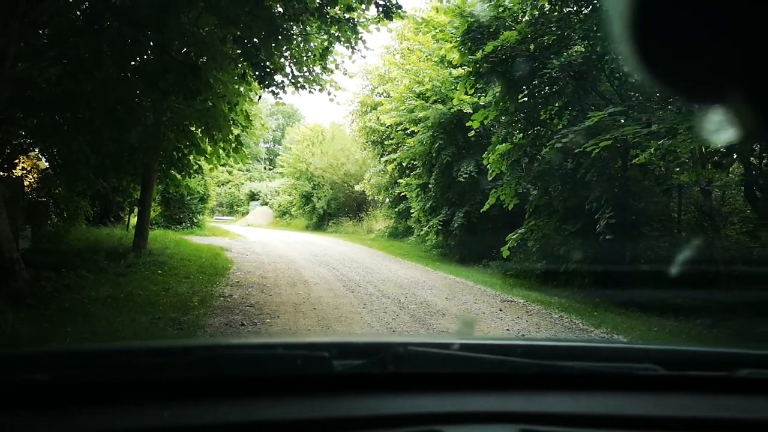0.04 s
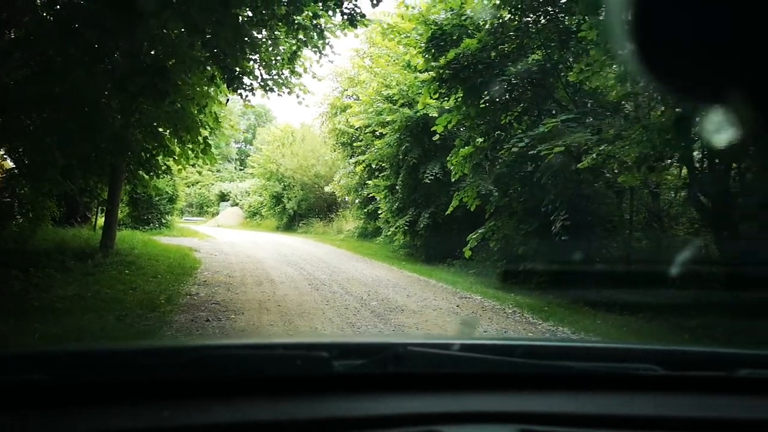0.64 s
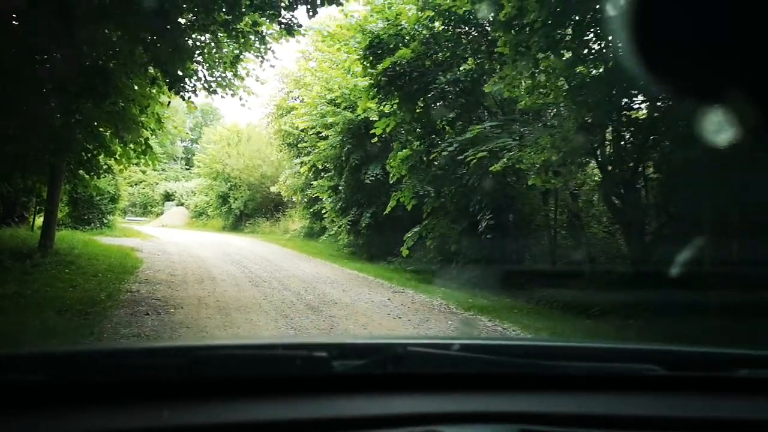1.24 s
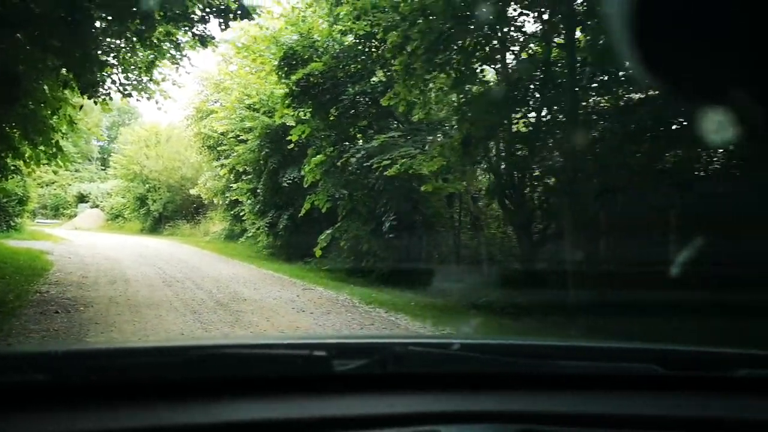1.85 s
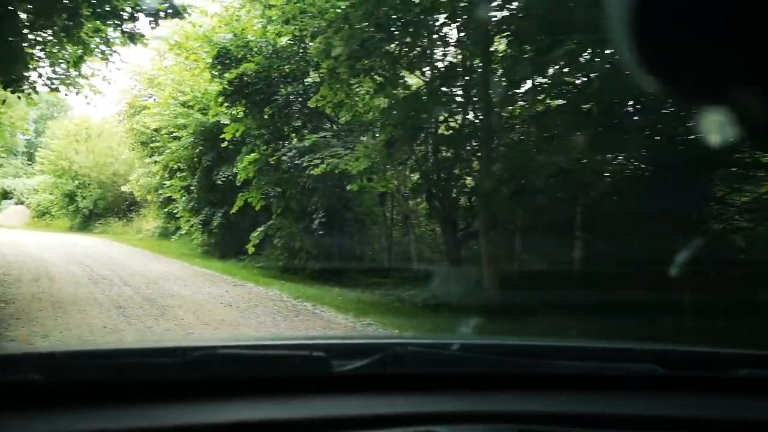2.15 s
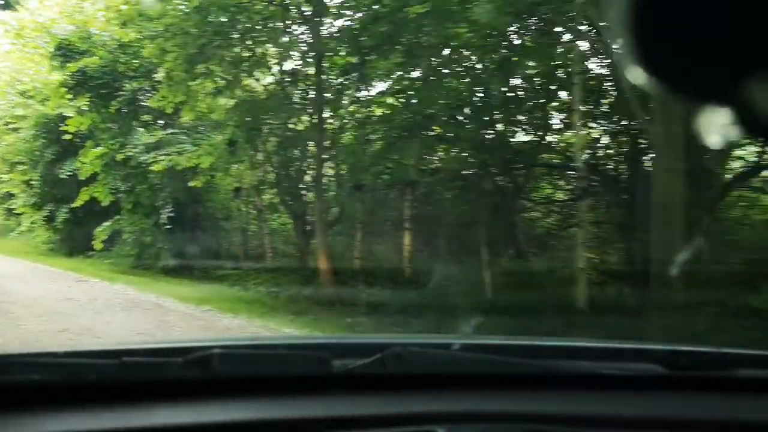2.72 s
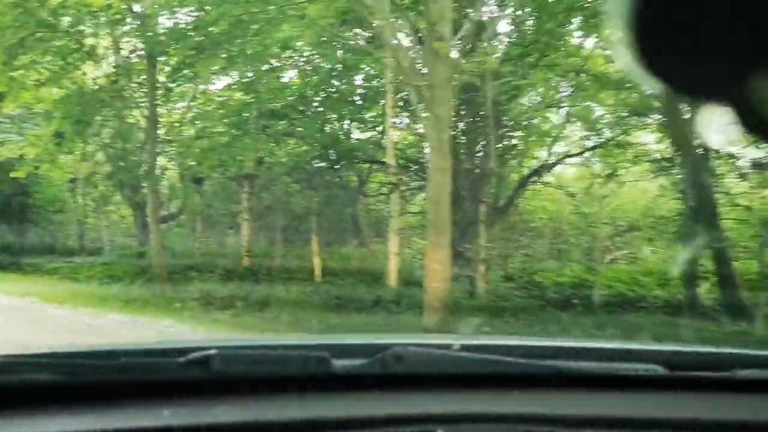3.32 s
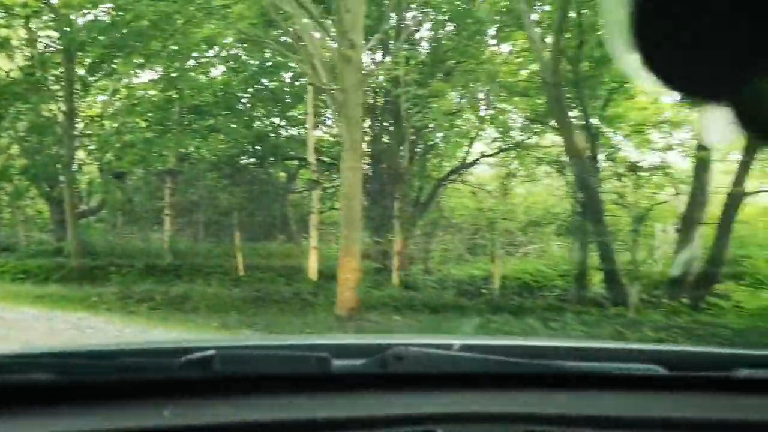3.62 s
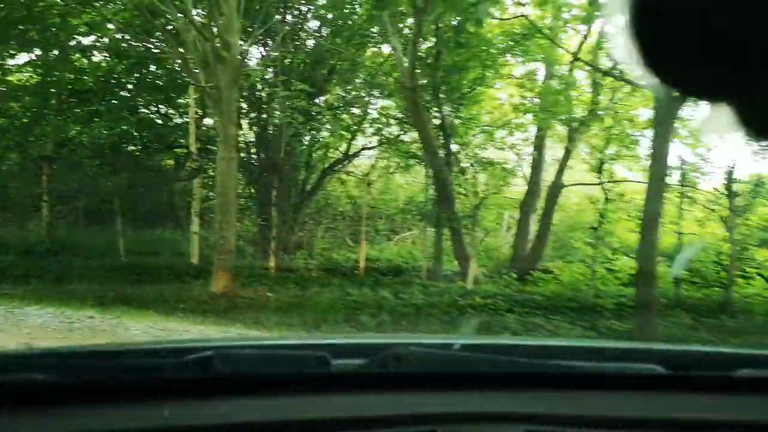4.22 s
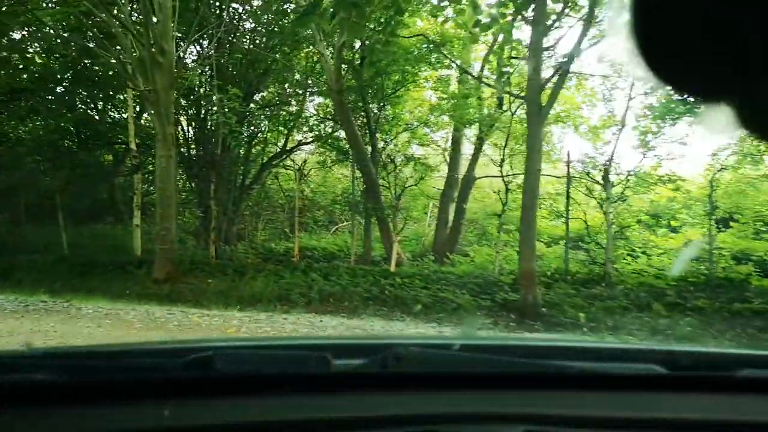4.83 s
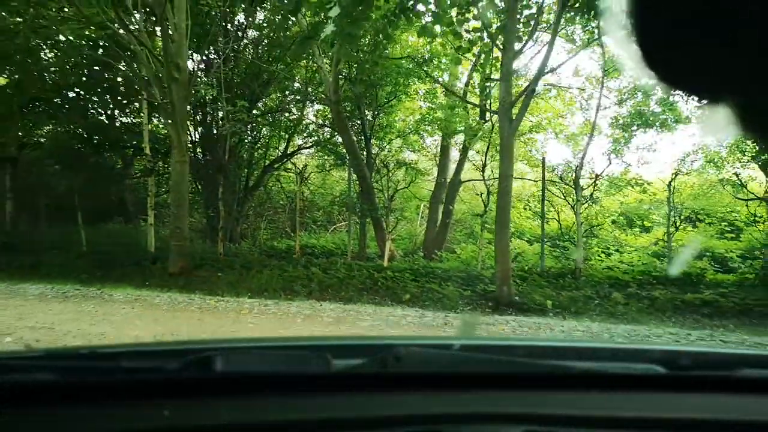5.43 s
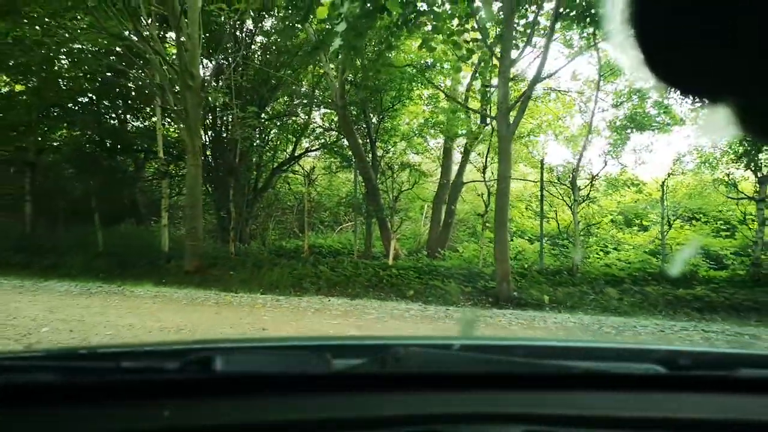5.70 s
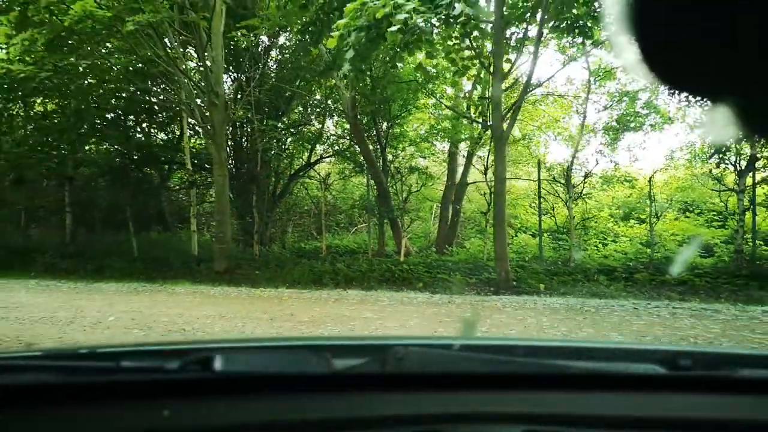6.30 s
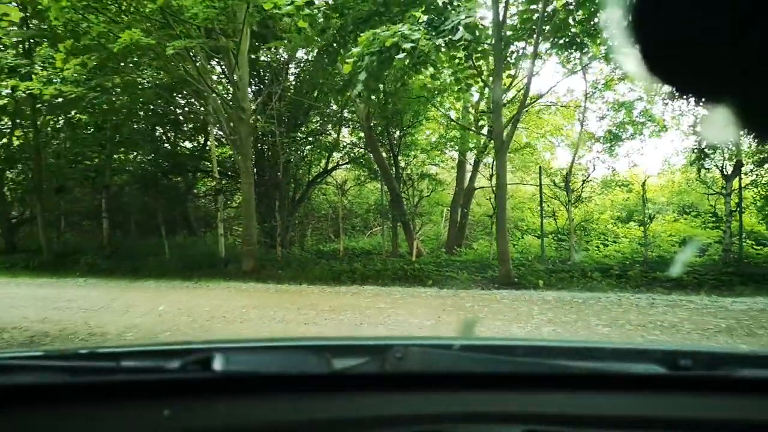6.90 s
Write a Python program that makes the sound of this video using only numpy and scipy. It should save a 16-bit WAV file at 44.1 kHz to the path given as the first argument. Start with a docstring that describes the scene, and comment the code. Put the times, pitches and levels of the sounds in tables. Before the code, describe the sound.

A low, steady rumble of engine and wheels fills the cabin of a slowly moving car, with the microphone behind the windscreen. A faint power steering whine fades early, and the panels drone over uneven ground. The engine booms louder around the middle and settles again. Much quieter, gravel crunches under the tyres, stones knock beneath the floor, the suspension gives dull thumps and the turning steering wheel rubs, clicks and creaks.

```python
"""Inside a car that creeps round a bend on a gravel track.
The engine booms when its firing matches the cabin's own note, and uneven ground makes the body rumble.
The tyres give a muffled crunch, stones knock under the floor and the suspension thumps.
The steering wheel hisses through the hands, and sticks and slips in creaks, scrapes and thin squeaks.
The power steering whines at first; gears, a belt, the tyre tread and air sound faintly behind it all."""
import sys
import numpy as np
from scipy import signal
from scipy.fft import rfft, irfft
from scipy.io import wavfile
from scipy.ndimage import uniform_filter1d

SR = 44100
rng = np.random.default_rng(int(sys.argv[2]) if len(sys.argv) > 2 else 0)


def wav_out(sig):
    """Save sig, one row per channel (or a flat mono array), as 16-bit PCM at SR to the path in sys.argv[1]."""
    wavfile.write(sys.argv[1], SR, np.round(np.clip(np.atleast_2d(sig).T, -1, 1) * 32767).astype(np.int16))


N = 315315
TIME = np.arange(N) / SR
EAR_DELAY_S = 0.0006  # a sound from the left reaches the right ear this much later


# how fast the crankshaft turns: (time [s], speed [turns/s])
ENGINE_SPEED = [(0, 26.6), (.5, 30.8), (.84, 31.3), (1.11, 27.4), (1.51, 25.2), (2.3, 27.3), (2.71, 31.4),
                (2.99, 32.8), (4.42, 32.3), (7.15, 30.9)]
# the engine rocking on its mounts: (time [s], level [dB])
ENGINE_SHAKE = [(0, -6), (.38, -11.5), (.5, -15.5), (.66, -9), (1.04, -23.5), (1.22, -7), (2.55, -13.5),
                (3.1, -10.5), (5.35, -10), (5.9, -14.5), (7.15, -14.5)]
# the throttle opening through the bend: (time [s], load [dB])
ENGINE_LOAD = [(0, -31), (.5, -21.5), (2.65, -26), (2.88, -10.5), (3.3, -11.5), (3.75, -14), (4.32, -12),
               (4.47, -20), (7.15, -20.5)]
def engine(cabin_hz=64.65, cabin_width_hz=7.5):
    """Four low tones at 1 to 4 times the turning speed; the second booms near the cabin's own note."""
    speed = curve(ENGINE_SPEED)
    angle = 2 * np.pi * (np.cumsum(speed) / SR - np.outer([EAR_DELAY_S, 0], speed))  # left side lags
    firing_hz = 2 * speed
    off_note_db = 10 * np.log10(1 + (2 * (firing_hz - cabin_hz) / cabin_width_hz) ** 2)
    boom_db = curve(ENGINE_LOAD) - off_note_db + 0.5 + 0.66 * drift(4.5)
    shake_db = curve(ENGINE_SHAKE) - 2.5 + 3 * drift(10)
    _, drone_db = ground()
    third_db = -35 + drone_db - drone_db.mean()
    fourth_db = -41 + 0.24 * (boom_db - boom_db.mean()) + 2 * drift(4)
    hum = sum(amp(db) * np.sin(k * angle + 2 * np.pi * rng.random())
              for k, db in enumerate([shake_db, boom_db, third_db, fourth_db], start=1))
    return hum * lean_left(-0.2)


# how uneven the track is: (time [s], rumble [dB], panel drone [dB])
ROUGHNESS = [(0, -45.5, -37.5), (.8, -42, -26.5), (2.3, -42, -22.5), (3.3, -45, -26.5), (4.25, -41.5, -27),
             (4.7, -44, -34.5), (6.3, -44.5, -33.5), (7.15, -42.5, -33)]
# humps in the track: (time [s], change in rumble [dB], change in panel drone [dB])
TRACK_HUMPS = [(.87, 3.5, 1.5), (1.3, 1.5, 6.5), (1.48, 7, -6.5), (1.81, 2.5, 11.5), (2.05, 2, -5),
               (2.38, 0, 5.5), (2.869, 5, 1.5), (5.27, 4.5, -0.5), (6.5, 5.5, -5.5)]
def ground(hump_s=0.076):
    """How hard the track shakes the car: rumble and drone levels in dB, shifted briefly by each hump."""
    humps = sum(np.outer(changes, np.exp(-((TIME - s) / hump_s) ** 2)) for s, *changes in TRACK_HUMPS)
    return np.array([curve(ROUGHNESS), curve(ROUGHNESS, column=2)]) + humps


# the deep note of the panels: (frequency [Hz], level [dB])
PANEL_SPECTRUM = [(30, -43), (55, -10.5), (78, 6.5), (92, -9), (110, -10), (132, -12), (160, -28),
                  (300, -80)]
# how alike left and right are for sound from the car's body: (frequency [Hz], likeness [-1 to 1])
BODY_LIKENESS = [(30, 1), (70, 0.97), (130, .9), (220, .92), (330, .66), (450, -0.23), (650, -0.49),
                 (2000, -0.33)]
def panels(gain_db=-4):
    """The body panels drone as the track shakes them."""
    _, drone_db = ground()
    return spread(noise(), PANEL_SPECTRUM, BODY_LIKENESS) * amp(drone_db + gain_db)


# the body swaying: (frequency [Hz], level [dB])
SWAY_SPECTRUM = [(5, -32.5), (13, 3.5), (20, -4), (32, -12.5), (45, -2.5), (60, -12), (80, -14),
                 (105, -24.5), (150, -39.5), (220, -87.5)]
# the wheels rumbling: (frequency [Hz], level [dB])
RUMBLE_SPECTRUM = [(60, -26), (128, 0.5), (160, -1.5), (200, -0.5), (250, -7.5), (300, -11.5), (370, -14),
                   (450, -24.5), (600, -30.5), (900, -46), (2000, -87.5)]
def road():
    """The body sways and rumbles as the wheels roll over uneven ground."""
    rough_db, _ = ground()
    sway = spread(noise(), SWAY_SPECTRUM, BODY_LIKENESS) * amp(-21 + 0.63 * (rough_db - rough_db.mean()))
    rumble = spread(noise(), RUMBLE_SPECTRUM, BODY_LIKENESS) * amp(rough_db - 1 + 1.56 * drift(7.3))
    return sway + rumble


# the crunch under the tyres: (time [s], level [dB])
CRUNCH_LEVEL = [(0, -64), (.4, -65.5), (.9, -62), (1.35, -63.5), (1.67, -57.5), (1.9, -61), (2.75, -60),
                (3.4, -64), (3.75, -64.5), (4.2, -60.5), (4.45, -67), (4.75, -60.5), (5.0, -69),
                (5.27, -61.5), (5.7, -63.5), (6.05, -60.5), (6.7, -61.5), (7.1, -56.5)]
# the crunch as it sounds indoors: (frequency [Hz], level [dB])
CRUNCH_SPECTRUM = [(250, -29), (520, -2.5), (660, -4.5), (750, -1.5), (830, -2), (950, -1.5), (1100, -5),
                   (1350, -7.5), (1640, -4), (1780, -1.5), (2000, -2), (2280, -4.5), (2500, -10),
                   (2850, -10), (3500, -18.5), (8000, -32.5), (16000, -65.5)]
# how alike left and right are for sound in the cabin air: (frequency [Hz], likeness [-1 to 1])
CABIN_LIKENESS = [(300, 0.035), (550, -0.041), (750, -0.64), (1000, -0.68), (1400, 0.046), (1800, 0.046),
                  (2400, -0.018), (4000, -0.1), (15000, 0.025)]
def gravel(gain_db=2):
    """Stones crackle finely under the tyres, muffled by doors and glass."""
    stones = grains(per_s=900, uneven_db=1.1, wash=0.94)
    stones = cabin_echoes(stones, echo_db=-5.5, decay_s=0.01, smooth_bins=9)
    crunch = spread(patchy(stones, depth_db=1.24), CRUNCH_SPECTRUM, CABIN_LIKENESS)
    return crunch * amp(curve(CRUNCH_LEVEL) + gain_db + drift(10)) * lean_left(0.6)


# stones hitting the floor: (time [s], level [dB], ringing pitch [Hz])
STONE_HITS = [(.852, -48, 1000), (.872, -46, 1300), (.889, -52, 900), (1.627, -48.5, 700),
              (1.648, -50, 1400), (1.666, -47, 1300), (2.164, -50.5, 1500), (3.973, -49.5, 750),
              (4.146, -50.5, 1000), (4.204, -49.5, 1200), (5.612, -45.5, 950), (5.627, -46, 1150),
              (5.675, -53, 1150), (5.725, -52.5, 950), (5.817, -42, 760), (5.977, -48, 1450),
              (6.257, -50, 950), (6.272, -51.5, 950), (6.837, -41.5, 850), (6.995, -52, 950),
              (7.017, -46.5, 750), (7.034, -47.5, 1050)]
# how the floor rings: (frequency [Hz], level [dB])
FLOOR_SPECTRUM = [(200, -5), (450, -13.5), (730, 1), (820, 1.5), (950, 2), (1100, -2.5), (1250, -9.5),
                  (1500, -9.5), (1800, -17.5), (3000, -25.5), (8000, -34), (16000, -62.5)]
def knocks(gain_db=2.5):
    """Stones squeezed out by the left tyres knock under the floor, each spot with its own note."""
    out = np.zeros((2, N))
    for s, db, hz in STONE_HITS:
        knock = blow(burst_s=0.0095, echo_s=0.028, echo_db=-10, rise_s=0.00019)
        add(out, s, amp(db + gain_db) * (knock + 0.86 * band(knock, hz, width_hz=260)))
    return ring(out, FLOOR_SPECTRUM) * lean_left(1.5)


# how the wheel arch rings: (frequency [Hz], level [dB])
ARCH_SPECTRUM = [(300, -33.5), (620, -11.5), (755, -4), (830, -7), (950, 3), (1050, -8), (1190, -10.5),
                 (1320, -16), (2200, -18), (6000, -61)]
def grinding(start_s=5.6, hardest_s=6.25, swell_s=0.71, trail_s=0.054):
    """Turned all the way, the left front tyre scrubs stones sideways; grit trails each knock."""
    stones = left_first(grains(per_s=200, uneven_db=0.5, wash=0.89)[0], EAR_DELAY_S)
    echoes = amp(-5) * noise()
    arch = unit(ring(stones + echoes, ARCH_SPECTRUM))
    scrub = amp(-55.5) * np.exp(-((TIME - hardest_s) / swell_s) ** 2)
    trails = sum(amp(db - 14) * (TIME > s) * np.exp(-abs(TIME - s) / trail_s)
                 for s, db, _ in STONE_HITS if s > start_s)
    return arch * np.hypot(scrub, trails) * amp(2 * drift(25)) * (TIME > start_s)


# jolts of the suspension: (time [s], level [dB])
JOLTS = [(2.997, -54), (3.617, -48), (3.972, -53), (5.126, -62), (5.388, -51.5), (6.471, -43.5),
         (6.837, -53.5)]
# the dull sound of a jolt: (frequency [Hz], level [dB])
JOLT_SPECTRUM = [(100, -0.5), (300, 0), (480, 0), (650, -3.5), (900, -16), (1500, -22), (4000, -50)]
def thumps(gain_db=12):
    """The suspension thumps where a wheel drops into a hollow."""
    out = np.zeros((2, N))
    for s, db in JOLTS:
        add(out, s, amp(db + gain_db) * blow(burst_s=0.0099, echo_s=0.011, echo_db=-13, rise_s=0.00029))
    return ring(out, JOLT_SPECTRUM)


# the rubbing, louder when the steering wheel slides faster: (time [s], level [dB])
RUB_LEVEL = [(0, -53.5), (.21, -61), (1.05, -64), (1.4, -69.5), (2.1, -70), (2.58, -65), (3.0, -67.5),
             (4.95, -71), (5.12, -65.5), (5.33, -65), (5.5, -72.5), (5.9, -65), (6.17, -71), (6.8, -67.5),
             (7.05, -59.5)]
# the hiss of hands on the rim: (frequency [Hz], level [dB])
RUB_SPECTRUM = [(1500, -27), (2600, -3), (3700, -3), (5200, -4), (5800, -1.5), (6400, -6.5), (7200, -2),
                (7900, -2), (9200, -11), (10200, -24.5), (15500, -44.5)]
def rubbing(gain_db=2):
    """The steering wheel slides through the hands with a fine, gritty hiss."""
    slips = grains(per_s=700, uneven_db=1.2, wash=1.3)
    slips = cabin_echoes(slips, echo_db=-5, decay_s=0.02, smooth_bins=21)
    hiss = spread(patchy(slips, depth_db=1.3), RUB_SPECTRUM, CABIN_LIKENESS)
    return hiss * amp(curve(RUB_LEVEL) + gain_db + 0.6 * drift(40)) * lean_left(0.8)


# single slips of the steering wheel and trim: (time [s], level [dB], ringing pitch [Hz])
SLIPS = [(1.114, -50.5, 3100), (1.449, -49.5, 6540), (1.505, -57, 4700), (1.544, -49.5, 4750),
         (1.592, -45.5, 2500), (1.618, -47, 4400), (1.636, -47, 4600), (1.647, -45, 4600),
         (1.665, -44, 4400), (1.678, -42, 4920), (1.699, -44.5, 4400), (1.819, -54, 4860),
         (1.944, -49.5, 4500), (2.010, -49.5, 8300), (2.052, -54.5, 4800), (3.739, -54.5, 4199),
         (3.754, -54.5, 4200), (3.819, -51, 4030), (3.833, -51.5, 5500), (3.876, -51, 4800),
         (3.884, -50, 5300), (3.893, -49, 5000), (3.920, -43.5, 4300), (3.972, -51.5, 2203),
         (4.037, -56, 7305), (4.054, -48.5, 7600), (5.124, -46, 5000), (5.234, -48, 2948),
         (5.239, -49, 5000), (5.248, -50, 4997), (5.269, -49, 2700), (5.331, -45.5, 2700),
         (5.338, -53, 2700), (5.372, -47, 2760), (5.393, -50, 2800), (5.876, -53, 5993), (5.901, -52, 7700),
         (5.967, -53, 5500), (6.012, -53, 5500), (6.067, -56, 4760), (6.199, -48.5, 2960),
         (6.411, -45, 7000), (6.452, -49, 4700), (6.481, -44, 2600), (6.511, -43.5, 7900),
         (6.895, -41.5, 3000), (6.906, -46, 5200), (6.913, -44, 4000), (6.928, -46, 4500),
         (7.015, -50, 5000)]
# how the plastic rings: (frequency [Hz], level [dB])
PLASTIC_SPECTRUM = [(300, -22), (700, -5), (1500, -6), (2300, -1), (2800, -1), (3300, -4.5), (4200, -3.5),
                    (5600, -2.5), (6500, -7), (7900, -4.5), (9300, -12), (11000, -21), (16000, -41)]
def creaks(gain_db=-4):
    """Plastic sticks, then slips with a dry snap; a quick run of snaps makes a creak."""
    out = np.zeros((2, N))
    for s, db, hz in SLIPS:
        delay_s = EAR_DELAY_S * rng.random()
        snap = blow(burst_s=0.0013, echo_s=0.017, echo_db=-19, rise_s=0.0011, delay_s=delay_s)
        snap = snap + 1.6 * band(snap, hz, width_hz=850)
        attack = snap[:, :round(0.004 * SR)]  # the snap itself sets the level, not its echoes
        add(out, s, snap / attack.std() * amp(db + gain_db))
    return ring(out, PLASTIC_SPECTRUM) * lean_left(1.5)


# longer scrapes: (time [s], length [s], pitch [Hz], band width [Hz], level [dB])
TRIM_SCRAPES = [(.45, .014, 1890, 1500, -56), (1.696, 0.12, 5170, 2510, -62), (2.71, 0.057, 2040, 800, -60),
                (3.129, .084, 4000, 3030, -64), (3.47, .034, 1980, 500, -60.5),
                (3.597, .082, 4870, 715, -67), (3.828, 0.085, 4600, 1796, -61.5),
                (4.058, .1, 7710, 1210, -68.5), (5.214, .08, 2500, 1700, -58.5),
                (5.381, .13, 5100, 2600, -64), (5.367, 0.062, 2760, 280, -55.5),
                (5.868, .11, 7600, 1010, -61.5), (5.964, .2, 1990, 390, -59), (6.33, .11, 7760, 1000, -61),
                (6.892, .065, 3000, 3000, -53.5), (6.938, 0.12, 3450, 2000, -66)]
def scrapes():
    """Runs of tiny slips swell and fade, each ringing one note of the trim."""
    out = np.zeros((2, N))
    slips = grains(per_s=1400, uneven_db=2, wash=1)
    for s, length_s, hz, width_hz, db in TRIM_SCRAPES:
        run = slips[:, int(s * SR):][:, :int(length_s * SR)]
        run = band(band(run, hz, width_hz), hz, 2 * width_hz)
        fade = signal.windows.tukey(run.shape[1], 0.7)
        add(out, s, unit(run * fade) * amp(db))
    return out * lean_left(2.5)


# thin squeaks: (time [s], length [s], first pitch [Hz], last pitch [Hz], level [dB])
RIM_SQUEAKS = [(1.16, 0.21, 2260, 2170, -68), (1.39, .07, 2630, 2400, -62), (1.426, .085, 2390, 2290, -56),
               (1.463, 0.058, 2490, 2660, -61), (5.049, .25, 2018, 1940, -61), (5.42, .14, 2270, 2360, -64)]
def squeaks(gain_db=1):
    """Where its slips fall nearly into step, the steering wheel's rim sings a short, raspy glide."""
    out = np.zeros((2, N))
    stutter = 1 + 0.035 * drift(170)
    for s, length_s, start_hz, end_hz, db in RIM_SQUEAKS:
        progress = np.clip((TIME - s) / length_s, 0, 1)
        hz = (start_hz + (end_hz - start_hz) * progress) * stutter
        out += np.sin(np.pi * progress) * tone(hz, db + gain_db, wobble=0.006, flutter_db=1)
    rasp = unit(1 + 0.35 * drift(200))
    return out * rasp * lean_left(3)


def steering_whine(end_s=1.5, fade_s=0.17):
    """The power steering sings two tones, loudest while it strains, then sinks in pitch and fades."""
    hz = 959 + 61.9 * np.exp(-TIME / 0.17)
    strain_db = 12 * np.exp(-TIME / 0.085)
    lower = tone(hz, db=-62 - 8 * TIME + strain_db, wobble=0.006)
    upper = tone(hz * 1.095, db=-69, wobble=0.0048)
    return (lower + upper) * np.clip((end_s - TIME) / fade_s, 0, 1)


# the gearbox's note, which follows the car's speed: (time [s], pitch [Hz])
GEAR_PITCH = [(0, 295.8), (1.4, 274.3), (3.1, 319.6), (5.0, 258.3), (7.15, 245.8)]
def gearbox():
    """The turning gears hum, slowly getting quieter."""
    return tone(curve(GEAR_PITCH), db=-54 - 0.52 * TIME, wobble=0.025)


def belt():
    """A running belt whines faintly and dies away."""
    return tone(hz=610, db=-64.5 - 2.5 * TIME, wobble=0.025)


def tread(start_s=1.25, length_s=1.55, start_hz=305, rise_hz_per_s=122):
    """The tyre tread gives a rough, rising moan as the car picks up speed."""
    age = np.clip(TIME - start_s, 0, length_s)
    swell = np.sqrt(abs(np.sin(np.pi * age / length_s)))
    return swell * tone(start_hz + rise_hz_per_s * age, db=-60, wobble=0.054)


# air in the cabin: (frequency [Hz], level [dB])
AIR_SPECTRUM = [(300, -19), (530, -1.5), (760, -1), (950, -1.5), (1150, -8), (1500, -12.5), (3000, -30)]
def cabin_air(level_db=-65):
    """A faint, steady rush of air."""
    return spread(noise(), AIR_SPECTRUM, CABIN_LIKENESS) * amp(level_db)


def amp(db):
    """Turns decibels into a gain."""
    return 10 ** (np.asarray(db) / 20)


def lean_left(db):
    """Gains that turn the left side up and the right side down by db."""
    return amp([[db], [-db]])


def unit(x):
    """Scales a signal to an average strength (rms) of 1."""
    return x / np.sqrt(np.mean(x ** 2) + 1e-20)


def noise(size=N):
    """White noise, different on each side."""
    return rng.standard_normal((2, size))


def curve(rows, column=1):
    """Joins a timed table's points with straight lines."""
    rows = np.array(rows)
    return np.interp(TIME, rows[:, 0], rows[:, column])


def look_up(rows, hz):
    """Reads a frequency table on a logarithmic scale."""
    row_hz, value = np.transpose(rows)
    return np.interp(np.log(hz + 1), np.log(row_hz + 1), value)


def add(mix, s, sound):
    """Lays a stereo sound into the mix at s seconds."""
    part = mix[:, max(round(s * SR), 0):][:, :sound.shape[1]]
    part += sound[:, :part.shape[1]]


def drift(hz):
    """A random wander of strength 1, up to about the given rate."""
    f = np.fft.rfftfreq(N, 1 / SR)
    return unit(irfft(rfft(rng.standard_normal(N)) * np.exp(-(f / hz) ** 2), N))


def spread(pair, spectrum, likeness):
    """Shapes two unrelated signals to a spectrum and blends them into left and right."""
    hz = np.fft.rfftfreq(N, 1 / SR)
    same = np.clip(look_up(likeness, hz), -1, 1)
    mid, side = rfft(pair) * amp(look_up(spectrum, hz)) * np.sqrt([1 + same, 1 - same])
    return unit(irfft(np.array([mid + side, mid - side]), N))


def ring(x, spectrum, size=4096):
    """Lets blows ring through a body with the given spectrum."""
    log_gain = np.log(amp(look_up(spectrum, abs(np.fft.fftfreq(size, 1 / SR)))))
    causal_gain = np.exp(np.conj(signal.hilbert(log_gain)))  # rings only after the blow
    response = np.fft.ifft(causal_gain).real[:size // 2]
    return signal.oaconvolve(x, response[None] / np.linalg.norm(response), axes=1)[:, :N]


def band(x, hz, width_hz):
    """Keeps the sound near one pitch."""
    return signal.lfilter(*signal.iirpeak(hz, hz / width_hz, fs=SR), x)


def left_first(x, delay_s):
    """Makes a stereo pair whose right side comes late."""
    t = TIME[:len(x)]
    return np.array([x, np.interp(t - delay_s, t, x, left=0)])


def blow(burst_s, echo_s, echo_db, rise_s, delay_s=EAR_DELAY_S, size=4000):
    """A short burst of noise from the left, followed by cabin echoes."""
    t = TIME[:size]
    burst = rng.standard_normal(size) * np.exp(-t / burst_s) * (1 - np.exp(-t / rise_s))
    echoes = amp(echo_db) * noise(size) * np.exp(-t / echo_s) * (1 - np.exp(-t / burst_s))
    return left_first(burst, delay_s) + echoes


def grains(per_s, uneven_db, wash):
    """Tiny impacts of uneven size over a wash of countless smaller ones."""
    sizes = amp(uneven_db * np.minimum(rng.exponential(1, N), 4))
    hits = rng.random(N) < per_s / SR
    return unit(sizes * hits * noise()) + wash * noise()


def tone(hz, db, wobble, flutter_db=3):
    """A note with unsteady pitch and level that reaches the left side first."""
    hz = hz * (1 + wobble * drift(30))
    turns = np.cumsum(hz) / SR - np.array([[0], [EAR_DELAY_S]]) * hz
    return unit(np.sin(2 * np.pi * turns)) * amp(db + flutter_db * drift(33))


def cabin_echoes(x, echo_db, decay_s, smooth_bins, size=3000):
    """Quick echoes from glass and trim put fine ripples in the spectrum, different on each side."""
    response = noise(size) * np.exp(-TIME[:size] / decay_s)
    response *= amp(echo_db) / np.linalg.norm(response, axis=1, keepdims=True)
    response[:, 0] = 1  # the direct sound
    ripples = rfft(response)
    broad_shape = np.sqrt(uniform_filter1d(abs(ripples) ** 2, smooth_bins))
    response = irfft(ripples / broad_shape)
    return unit(signal.oaconvolve(x, response[:, :size // 2], axes=1)[:, :N])


def patchy(x, depth_db):
    """Lets patches of the spectrum swell and sink on their own."""
    spectra = signal.stft(x, nperseg=1024, noverlap=768)[2]
    swells = rng.standard_normal(spectra.shape[:0:-1])
    swells = uniform_filter1d(swells, 12, axis=0)  # smooth over time
    swells = unit(uniform_filter1d(swells, 10, axis=1))  # and over frequency
    return unit(signal.istft(spectra * amp(depth_db * swells.T), nperseg=1024, noverlap=768)[1][:, :N])


def scene():
    """Everything as heard behind the windscreen."""
    car = engine() + panels() + road() + gearbox() + belt() + tread()
    track = gravel() + grinding() + knocks() + thumps()
    steering = rubbing() + creaks() + scrapes() + squeaks() + steering_whine()
    return car + track + steering + cabin_air()


def record(dry):
    """Cuts the highest treble, above 15700 Hz."""
    low_pass = signal.firwin(511, 15700, window=("kaiser", 9), fs=SR)
    return signal.oaconvolve(dry, low_pass[None], "same")


dry = scene()
out = record(dry)
wav_out(out)
```